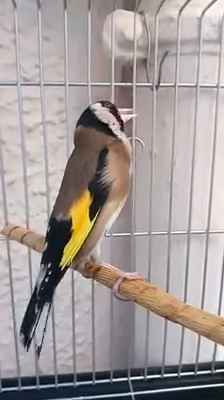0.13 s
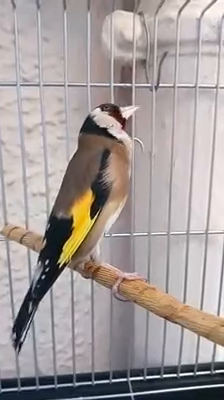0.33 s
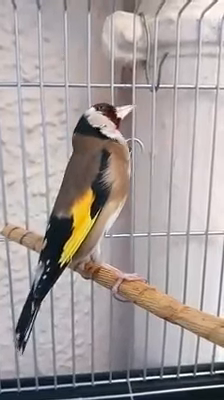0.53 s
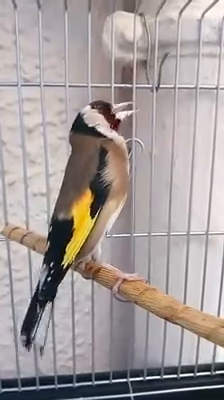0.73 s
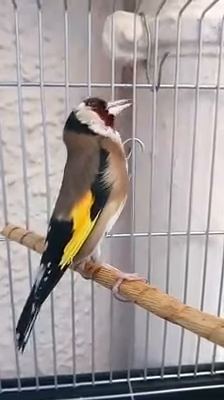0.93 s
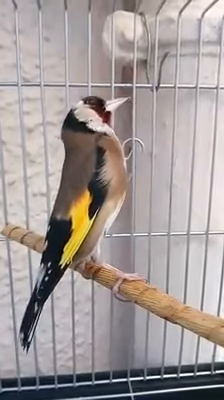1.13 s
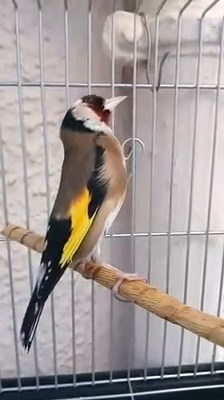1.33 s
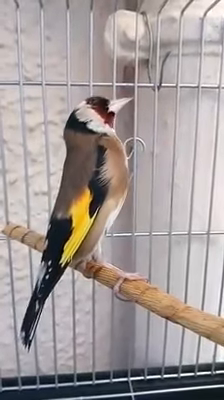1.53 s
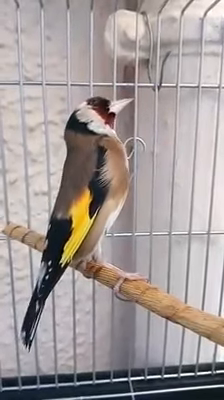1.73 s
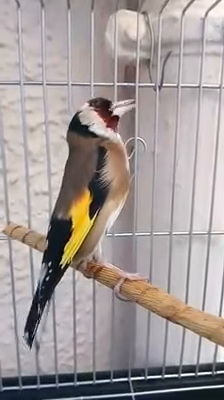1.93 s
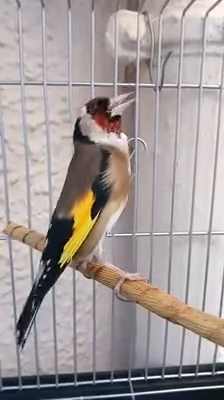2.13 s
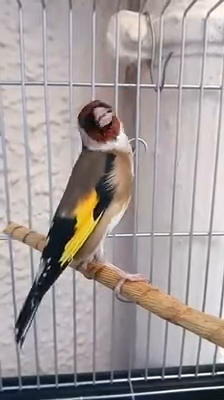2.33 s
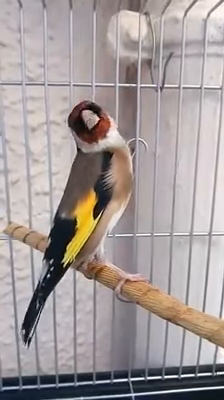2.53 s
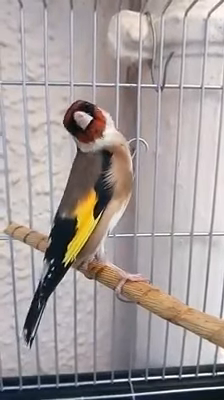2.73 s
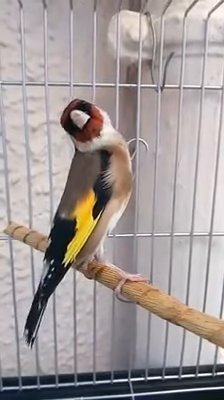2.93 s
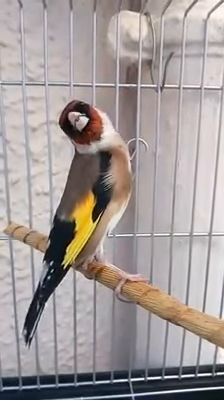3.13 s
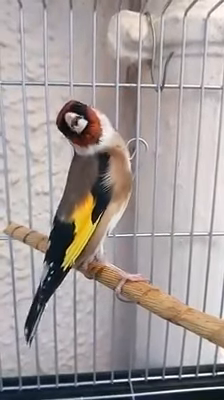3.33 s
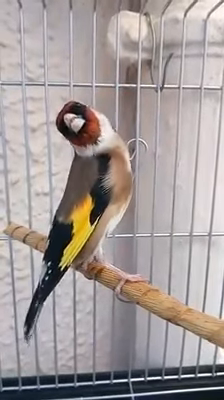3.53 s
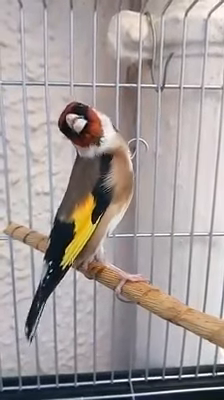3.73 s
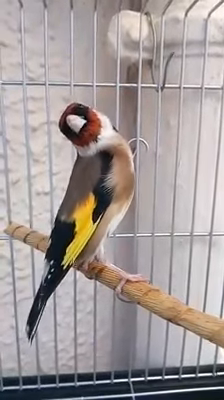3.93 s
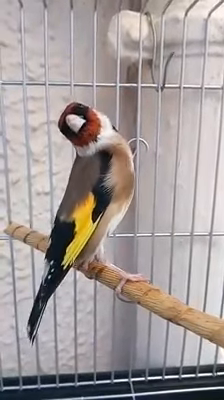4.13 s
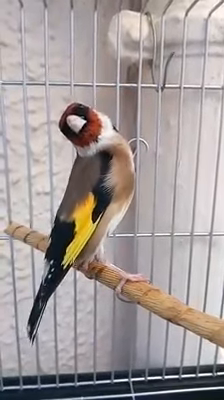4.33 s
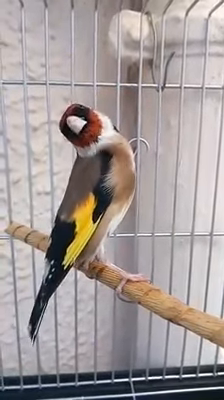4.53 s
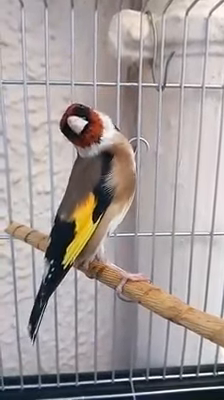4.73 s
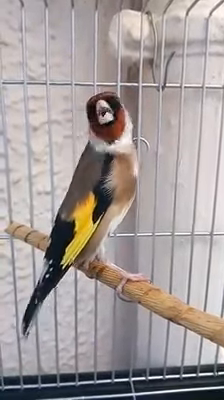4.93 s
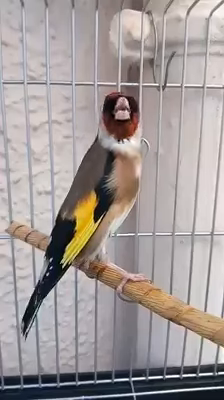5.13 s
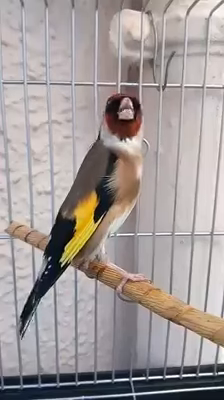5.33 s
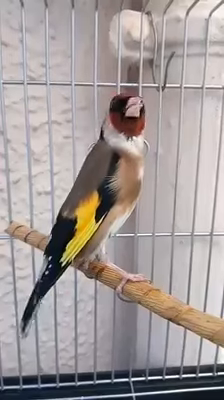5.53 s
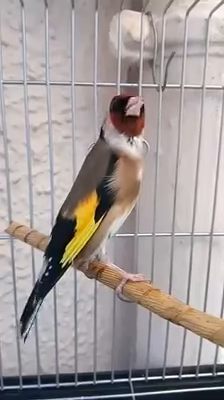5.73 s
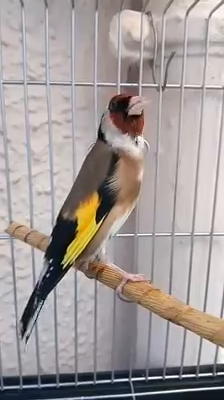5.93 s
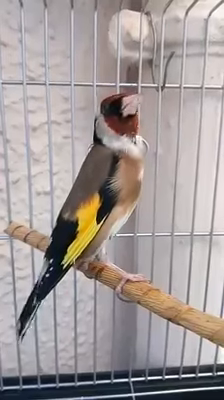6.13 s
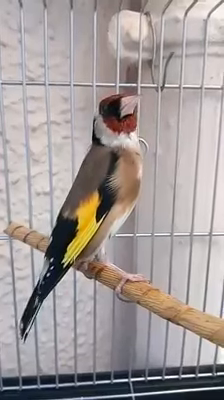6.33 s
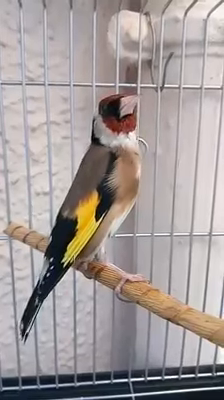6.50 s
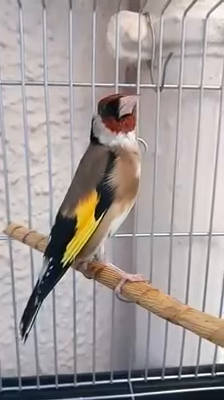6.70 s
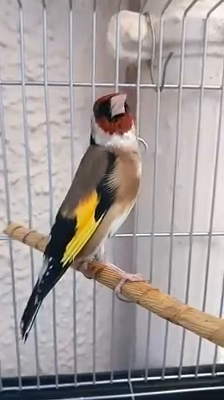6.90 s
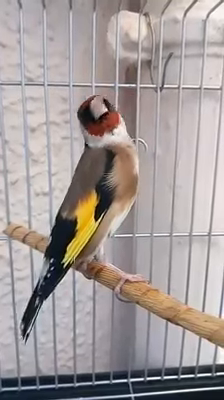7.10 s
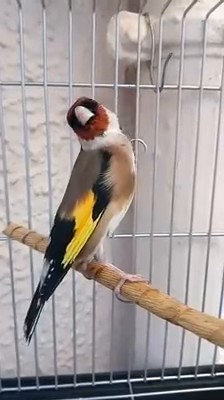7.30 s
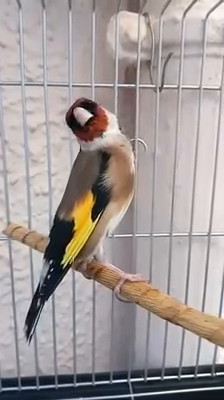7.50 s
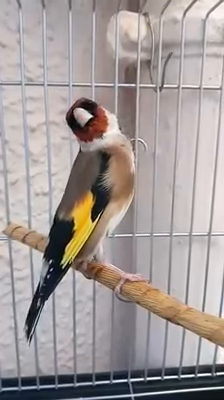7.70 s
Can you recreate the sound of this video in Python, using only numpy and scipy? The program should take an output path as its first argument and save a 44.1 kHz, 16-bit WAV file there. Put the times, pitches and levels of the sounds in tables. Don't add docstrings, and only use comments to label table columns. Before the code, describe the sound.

One small caged finch sings very close to a phone microphone in a hard-walled, echoing space. Short bouts of sharp, rising whistles alternate with pauses; the fifth bout is the longest, a dense rattling twitter. After a gap comes one last lone bright note. Soft city rumble and hiss continue underneath, dipping under each loud note, while faint distant birds chirp, mostly near the end. Treble is slightly gritty and fizzy.

```python
import sys
import numpy as np
from scipy import signal
from scipy.fft import rfft, irfft
from scipy.io import wavfile
from scipy.ndimage import uniform_filter1d, minimum_filter1d

SR = 44100
rng = np.random.default_rng(int(sys.argv[2]) if len(sys.argv) > 2 else 0)


def wrap_up_sound(samples):
    columns = np.atleast_2d(samples).T
    tamed = np.clip(columns, -1, 1)
    steps = np.round(tamed * 32767).astype(np.int16)
    wavfile.write(sys.argv[1], SR, steps)


def boost_factor(decibels):
    exponent = np.asarray(decibels, float) / 20
    return 10 ** exponent


N = 342216

# level_db, attack_end (share), release_start (share), entry_db, exit_db
RISE_VOICES = [
    ((0, .049, 3350, 5350, 1.45, 2.5, 0), (-6, .6, .7, -44, -16)),
    ((0, .056, 3050, 4740, 2.1, 3.8, 0), (-18, .33, .8, -21, -10)),
    ((.004, .026, 4000, 5700, 1.05, 1.2, 0), (-27, .45, .65, -14, -14)),
]
GRUNT_VOICES = [
    ((0, .025, 2600, 2890, 1.05, 1.8, 0), (-24, .48, .55, -22, -18)),
    ((0, .024, 5150, 5850, 1.05, 1.8, 0), (-32, .3, .8, -8, -12)),
]
DIP_VOICES = [
    ((0, .015, 4100, 2850, .98, 2.4, 0), (-14, .33, .4, -22, -12)),
    ((.012, .024, 2900, 3500, 1.1, 3.5, 0), (-10, .42, .55, -14, -24)),
]
PAIR_VOICES = [
    ((0, .029, 3600, 5500, 1.3, 2.2, 350), (-4, .56, .62, -40, -15)),
    ((0, .02, 3200, 4400, 1.1, 1.2, 0), (-19, .3, .7, -10, -14)),
    ((.026, .022, 4500, 5600, 1.3, 1.3, 0), (-2, .34, .42, -20, -26)),
]
# start_s, strength_db, lead_start_hz, lead_end_hz, other_voices_db
RISES = [(.9375, -2, 3650, 5500, 2), (2.1478, 0, 3700, 5530, 3), (2.333, 0, 3250, 5400, -2),
         (3.2672, 0, 3600, 5360, 2), (3.4502, 0, 3150, 5340, -1), (3.623, 0, 3300, 5340, 0),
         (3.8048, 0, 3370, 5360, -1), (4.9682, 0, 3290, 5400, 1), (5.159, 0, 3300, 5250, 0),
         (5.3435, 0, 3450, 5260, 0), (5.5248, -1, 3360, 5250, 0)]
LAZY_RISES = [
    (.1905, 0, 4400, 5550, 0),
]
GRUNTS = [
    (5.066, 0, 2600, 2890, 0),
    (5.249, -2, 2600, 2870, 0),
    (5.431, -4, 2610, 2880, 0),
]
DIPS = [
    (5.619, 0, 4100, 2850, 0),
    (5.8013, 0, 4080, 2850, 0),
    (5.995, 0, 4130, 2870, 0),
    (6.1787, 0, 4050, 2880, 0),
]
PAIRS = [
    (5.7124, 0, 3600, 5480, 0),
    (5.8925, -1, 3600, 5440, 0),
    (6.0862, -1, 3600, 5500, 1),
    (6.2718, -2, 3600, 5520, 0),
]


def evened(x):
    return x / np.sqrt(np.mean(x ** 2) + 1e-20)


def read(points, hz):
    f, value = np.transpose(points)
    return np.interp(np.log(hz + 1), np.log(f + 1), value)


def add(mix, s, sound):
    part = mix[round(s * SR):][:len(sound)]
    part += sound[:len(part)]


def coloured(x, gain):
    return irfft(rfft(x) * gain(np.fft.rfftfreq(len(x), 1 / SR)), len(x))


def above(hz, edge_hz):
    return np.clip((hz - edge_hz) / 240 + .5, 0, 1)


def smeared(x, rows, columns):
    return uniform_filter1d(uniform_filter1d(x, size=rows[0], axis=rows[1]), size=columns[0], axis=columns[1])


def wander(count, size):
    noise = rng.standard_normal(SR // 4)
    return evened(uniform_filter1d(uniform_filter1d(noise, size), size))[:count]


def hum():
    # pitch_hz, level_db (per Hz)
    spectrum = [(18, -40), (30, -17), (70, -1.5), (426, -10.5), (988, -7.5), (2830, -12.5), (3060, -15.5),
                (4530, -22), (5740, -21), (8080, -43), (14000, -39.5), (16000, -43.5)]
    # time_s, hiss_db, rumble_db
    swell = [
        (0.0, -50.5, -58.5),
        (3.02, -55.5, -57),
        (3.35, -56.5, -61),
        (7.76, -52.5, -56.5),
    ]
    gust = 6.95, 0.063, 9.9
    drone = 65, 14, 5.14
    gust_s, gust_width_s, gust_peak_db = gust
    drone_hz, drone_width_hz, drone_peak_db = drone
    frames = N // 512 + 5
    t = np.arange(frames) * 512 / SR
    hz = np.fft.rfftfreq(2048, 1 / SR)[:, None]
    a, b, patches = rng.standard_normal((frames, 1025, 3)).T
    patches = evened(smeared(patches, (16, 0), (8, 1)))
    s, hiss_db, rumble_db = np.transpose(swell)
    low = np.clip((350 - hz) / 200, 0, 1)
    rumble_swell_db = np.interp(t, s, rumble_db - rumble_db.mean())
    hiss_swell_db = np.interp(t, s, hiss_db - hiss_db.mean())
    swell_db = low * rumble_swell_db + (1 - low) * hiss_swell_db
    drone_db = drone_peak_db * np.exp(-((hz - drone_hz) / drone_width_hz) ** 2)
    gust_db = gust_peak_db * np.exp(-((t - gust_s) / gust_width_s) ** 2 - ((hz - 350) / 300) ** 2)
    level_db = read(spectrum, hz) + (2.5 + 0.53 * low) * patches + swell_db + drone_db + gust_db
    wash = signal.istft((a + 1j * b) * boost_factor(level_db), nperseg=2048, noverlap=1536)[1][:N]
    return boost_factor(-54) * evened(wash)


def walls(x):
    # pitch_hz, t60_s
    decay = [(2500, 0.6), (3600, 0.7), (4700, 0.5), (5500, .62), (9000, 0.4)]
    # delay_s, level_db
    slaps = [
        (.008, -27),
        (0.04, -27),
        (.085, -27),
        (.13, -33),
    ]
    hz, t, z = signal.stft(rng.standard_normal(SR), SR, nperseg=256)
    tail = signal.istft(z * boost_factor(-60 * t / read(decay, hz)[:, None]), SR, nperseg=256)[1]
    tail = boost_factor(-24) * tail / np.linalg.norm(tail)
    for s, db in slaps:
        smear = evened(rng.standard_normal(1300) * np.hanning(1300))
        add(tail, s, boost_factor(db) * smear / np.sqrt(1300))

    def wall_colour(hz):
        low_escape_db = -3 * np.log2(hz / 4200 + .1) ** 2
        return boost_factor(low_escape_db + 3 * above(hz, 5250) - 4 * above(hz, 7100)) * (1 - above(hz, 9000))

    return signal.fftconvolve(x, coloured(tail, wall_colour)[:SR - 4000])[:N]


def far_birds():
    # start_s, top_hz, level_db
    chirps = [(.588, 3950, -48), (.62, 4000, -58), (.73, 3670, -57), (.9, 4300, -41), (4.005, 3300, -48),
              (6.76, 3240, -56), (6.79, 3200, -49), (6.89, 5000, -50), (7.135, 3400, -44),
              (7.158, 3900, -48), (7.288, 3400, -52), (7.39, 3400, -51), (7.425, 3250, -43),
              (7.497, 5100, -49), (7.593, 3800, -44), (7.672, 4010, -46)]
    # start_s, length_s, start_hz, end_hz, level_db
    far_calls = [(.13, .04, 2700, 2720, -47), (.47, .11, 810, 776, -47), (.535, .04, 1300, 1255, -47.5),
                 (1.265, .086, 5700, 2836, -55), (1.33, .12, 1300, 1285, -49), (1.36, .2, 2400, 2400, -55),
                 (1.42, .1, 1480, 1520, -52), (3.05, .07, 700, 690, -51.5), (3.2, .06, 700, 700, -52),
                 (5.2, .1, 750, 747, -48), (5.9, .14, 730, 730, -51), (6.813, .035, 3100, 2550, -50.5),
                 (6.93, .03, 3300, 2960, -49.5), (7.36, .04, 5600, 6400, -59)]
    chirp_hz, chirp_s, chirp_hz_per_s = 2880, .018, 1.3e5
    calls = [(*call, 0) for call in far_calls]
    for s, top_hz, db in chirps:
        calls.append((s, chirp_s + (top_hz - chirp_hz) / chirp_hz_per_s, chirp_hz, top_hz, db, -11))
    out = np.zeros(N)
    for s, length, start_hz, end_hz, db, fade_db in calls:
        u = np.linspace(0, 1, round(length * SR))
        flutter = .7 + start_hz / 5000 * wander(count=len(u), size=round(1.6e5 / start_hz))
        turn = 2 * np.pi * np.cumsum(start_hz + (end_hz - start_hz) * u) / SR
        add(out, s, boost_factor(db + fade_db * (u - .4)) * flutter * np.sin(turn) * np.hanning(len(u)))
    return out


def whistle(length, start_hz, end_hz, ease_in, ease_out, sag_hz, db, attack, release, entry_db, exit_db):
    roundness = 1.6
    u = np.linspace(0, 1, round(length * SR))
    glide = 1 - (1 - u ** ease_in) ** ease_out
    hz = start_hz + (end_hz - start_hz) * glide - sag_hz * u ** 1.4
    hz = hz * (1 + 0.004 * wander(count=len(u), size=60))
    turn = 2 * np.pi * (np.cumsum(hz) / SR + rng.random())
    tone = np.sin(turn) + boost_factor(-46) * np.sin(2 * turn)
    waver_db = 1.4 * wander(count=len(u), size=70)
    opening = np.clip(1 - u / attack, 0, 1) ** roundness
    closing = np.clip((u - release) / (1 - min(release, .97)), 0, 1) ** roundness
    breath_db = entry_db * opening + exit_db * closing
    return np.sqrt(2) * tone * boost_factor(db + breath_db + waver_db) * signal.windows.tukey(len(u), .12)


def sung_notes():
    hook = [
        ((0, .047, 3200, 5750, 1.01, 13, 210), (-9, .3, .82, -33, -18)),
        ((-.002, .048, 4100, 6980, .95, 7, 0), (-11, .22, .25, -30, -30)),
        ((.01, .04, 4800, 4250, 1.1, 1.2, 0), (-44, .2, .8, -6, -8)),
    ]
    held_hook = [
        ((0, .046, 3200, 5700, 1.01, 12, 130), (-10, .27, .85, -32, -18)),
        ((-.002, .044, 4100, 6720, .95, 9, 0), (-13, .22, .65, -34, -18)),
    ]
    lazy_rise = [
        ((0, .052, 4400, 5550, 1.9, 2.2, 0), (-9, .58, .62, -7, -22)),
        ((0, .048, 3450, 4750, 2.3, 2.2, 0), (-24, .1, .7, -10, -12)),
        ((.003, .026, 5100, 6000, 1.05, 1.2, 0), (-25, .2, .6, -10, -14)),
    ]
    fall = [
        ((0, .034, 6450, 5500, 1.1, 1.8, 0), (-6, .52, .62, -20, -20)),
        ((.002, .032, 8500, 6950, 1.1, 2.5, 0), (-25, .7, .92, -5, -8)),
    ]
    flick = [
        ((0, .021, 4900, 7600, .92, 1.05, 0), (-7, .45, .55, -11, -36)),
        ((.004, .019, 4600, 6100, .95, 1.8, 0), (-12, .3, .75, -12, -14)),
    ]
    # start_s, strength_db, lead_start_hz, lead_end_hz, other_voices_db
    hooks = [
        (.0484, -1, 3300, 5850, -1),
        (.7828, 0, 3200, 5740, -1),
        (3.1195, 0, 3200, 5660, 0),
        (6.9931, 0, 3200, 5720, -4),
    ]
    held_hooks = [
        (2.0048, 0, 3200, 5700, 0),
        (4.8403, 2, 3200, 5670, 0),
    ]
    short_hooks = [
        (.3045, -3, 3700, 5480, 7),
    ]
    falls = [
        (2.2596, -2, 6550, 5600, 4),
        (2.4387, -2, 6600, 5520, 0),
        (3.381, 1, 6480, 5560, -3),
        (3.5516, 0, 6470, 5480, 0),
        (3.7324, -2, 6490, 5380, 3),
    ]
    flicks = [(5.1112, 0, 4900, 7800, 0), (5.2931, 0, 4900, 7790, 0), (5.4765, -2, 4950, 7700, 0),
              (5.664, -1, 5000, 7650, -1), (5.8469, -1, 5000, 7750, -2), (6.044, 0, 4950, 7750, -3),
              (6.2255, -1, 4950, 7670, -2)]
    phrases = (
        (hook, hooks, 1), (held_hook, held_hooks, 1), (held_hook, short_hooks, .76),
        (lazy_rise, LAZY_RISES, 1), (RISE_VOICES, RISES, 1), (fall, falls, 1), (GRUNT_VOICES, GRUNTS, 1),
        (flick, flicks, 1), (DIP_VOICES, DIPS, 1), (PAIR_VOICES, PAIRS, 1))
    song = np.zeros(N)
    for voices, rows, pace in phrases:
        usual_start, usual_end = voices[0][0][2:4]
        for s, strength_db, start_hz, end_hz, others_db in rows:
            for k, (glide, (db, *breath)) in enumerate(voices):
                delay, length, first_hz, last_hz, *ease = glide
                first_hz = first_hz * start_hz / usual_start
                last_hz = last_hz * end_hz / usual_end
                voice_db = db + strength_db + others_db * (k > 0)
                note = whistle(pace * length, first_hz, last_hz, *ease, voice_db, *breath)
                add(song, s + pace * delay, note)
    return song


def leading_noise():
    noise_lead = np.zeros(N)
    for voices, rows in ((RISE_VOICES, LAZY_RISES + RISES), (PAIR_VOICES, PAIRS),
                         (GRUNT_VOICES, GRUNTS), (DIP_VOICES, DIPS)):
        lead_s = voices[0][0][1]
        for s, strength_db, *_ in rows:
            add(noise_lead, s - .012, boost_factor(strength_db - 33) * np.hanning(round(.9 * lead_s * SR)))
    return noise_lead


def finch():
    # centre_s, half_width_s, level_db
    throbs = [(0.053, 0.003, 5.0), (0.197, 0.004, 2.0), (0.208, 0.005, -6.0), (0.219, 0.003, 5.0),
              (0.228, 0.004, -4.0), (0.312, 0.004, 6.0), (0.328, 0.008, -4.0), (0.815, 0.006, 4.0),
              (0.949, 0.004, 5.3), (0.975, 0.002, -7.1), (2.005, 0.002, 8.2), (2.046, 0.003, -6.1),
              (2.155, 0.004, 6.2), (2.165, 0.004, -8.4), (2.267, 0.003, -7.0), (2.283, 0.004, -4.6),
              (2.337, 0.002, 10.4), (2.348, 0.006, -5.8), (2.447, 0.004, -7.3), (3.274, 0.006, 6.1),
              (3.284, 0.003, -5.6), (3.381, 0.002, -10.8), (3.456, 0.003, 6.8), (3.466, 0.006, -9.1),
              (3.498, 0.008, 3.7), (3.556, 0.002, 8.0), (3.627, 0.003, 10.7), (3.743, 0.004, -7.3),
              (3.764, 0.004, 9.1), (3.809, 0.002, 7.7), (4.882, 0.003, -7.4), (4.972, 0.004, 9.5),
              (5.113, 0.002, -6.3), (5.299, 0.002, 7.7), (5.309, 0.003, 5.0), (5.35, 0.006, 4.8),
              (5.482, 0.003, 5.6), (5.529, 0.003, 7.9), (5.568, 0.006, -4.3), (5.665, 0.002, -13.2),
              (5.85, 0.002, -7.3), (6.189, 0.004, -5.2), (6.229, 0.004, -6.1), (6.245, 0.004, 5.0)]
    # time_s, level_db
    facing = [(0, 7), (1.2, 7), (2, 1), (5.3, 0), (5.6, -4), (6.5, -3), (7.76, 2)]
    # pitch_hz, level_db
    noise_colour = [(1800, -43.5), (2800, -9), (6500, 2), (8650, -5), (8950, -42), (11000, -29), (12800, -44),
                    (14500, -28)]
    song = sung_notes()
    t = np.arange(N) / SR
    for s, width, db in throbs:
        near = slice(round((s - 3 * width) * SR), round((s + 3 * width) * SR))
        song[near] *= boost_factor(db * np.exp(-((t[near] - s) / width) ** 2))
    song = song + 0.06 * boost_factor(np.interp(t, *np.transpose(facing))) * song ** 3
    effort = np.sqrt(abs(uniform_filter1d(song ** 2, size=400)))
    air = evened(coloured(rng.standard_normal(N), lambda hz: boost_factor(read(noise_colour, hz))))
    return song + (boost_factor(-34) * effort + leading_noise()) * air


def scene():
    # time_s, level_db
    to_walls = [(0, 2), (.26, 1), (.3, 7), (.4, 7), (.75, 0), (2, -1), (3.1, 1), (5.55, 0), (5.6, -2),
                (6.4, -2), (6.9, 4), (7.76, 4)]
    bird, others = finch(), far_birds()
    sent = bird * boost_factor(np.interp(np.arange(N) / SR, *np.transpose(to_walls)))
    return (bird + others + walls(sent + 2.1 * others) + hum())[None]


def limiter(x):
    power_db = 10 * np.log10(abs(uniform_filter1d(x ** 2, size=200)) + 1e-12)
    fall = np.arange(N) * 270.0 / SR
    held_db = np.maximum.accumulate(power_db + fall) - fall
    over_db = np.maximum(held_db + 26.5, 0)
    return x / boost_factor(0.37 * uniform_filter1d(over_db, size=150))


def coarse_core(x):
    hole_db, grit_db = -19.5, -22
    hz, s, z = signal.stft(x, SR, window="cosine", nperseg=1024)
    masking = np.sqrt(smeared(abs(z) ** 2, (32, 0), (32, 0)))
    step = boost_factor(-14) * masking + 1e-9
    bands = np.add.reduceat(abs(z) ** 2, np.arange(0, 513, 8), axis=0) / 8
    bands = np.repeat(bands, 8, axis=0)[:513]
    kept = minimum_filter1d(bands / masking ** 2, size=2, axis=1) > boost_factor(2 * hole_db)
    rounded = np.round(z.real / step) + 1j * np.round(z.imag / step)
    z = step * rounded * np.where(kept, 1, boost_factor(-25))
    wide = np.sqrt(abs(smeared(abs(z) ** 2, (60, 0), (40, 0))))
    wide = wide * np.where(wide.max(0) < .1 * wide.max(), boost_factor(8), 1)
    patchy = boost_factor(5.0 * np.repeat(rng.standard_normal((len(s), 33)), 16, axis=1).T[:513])
    grit = rng.standard_normal((len(s), 513, 2)).T
    grit_level = boost_factor(grit_db) * wide * patchy * above(hz, 2750)[:, None] * kept
    z = z + grit_level * (grit[0] + 1j * grit[1])
    return signal.istft(z, SR, window="cosine", nperseg=1024)[1][:N]


def steady_tones(gain, hz, s):
    # start_s, length_s, pitch_hz, level_db (rms)
    fill_tones = [(0.795, 0.03, 6937.5, -27.8), (0.886, 0.023, 6937.5, -39.6),
                  (2.027, 0.033, 6937.5, -28.3), (2.454, 0.015, 6937.5, -22.3),
                  (3.133, 0.036, 6937.5, -22.6), (3.271, 0.028, 8437.5, -54.0),
                  (3.378, 0.022, 8437.5, -42.1), (3.485, 0.016, 9187.5, -56.1),
                  (3.533, 0.03, 9187.5, -42.7), (3.558, 0.024, 12937.5, -55.0),
                  (3.566, 0.016, 6937.5, -19.7), (3.611, 0.028, 6937.5, -43.5),
                  (3.74, 0.028, 12937.5, -57.2), (4.858, 0.034, 6937.5, -29.2),
                  (4.99, 0.019, 9937.5, -51.6), (5.184, 0.017, 9937.5, -52.8),
                  (5.367, 0.017, 9937.5, -53.7), (5.538, 0.044, 9937.5, -57.7),
                  (5.624, 0.021, 9937.5, -62.8), (5.816, 0.023, 9937.5, -61.7),
                  (7.008, 0.019, 6937.5, -18.9), (7.008, 0.02, 12937.5, -54.7),
                  (7.009, 0.017, 14437.5, -51.9),
                  (3.393, .018, 6937.5, -20), (3.411, .017, 6937.5, -33), (3.582, .016, 6937.5, -29),
                  (7.027, .027, 6937.5, -27), (7.054, .09, 6937.5, -50), (7.14, .11, 6937.5, -58),
                  (.83, .11, 6937.5, -44), (.94, .14, 6937.5, -60), (3.17, .09, 6937.5, -42),
                  (3.43, .1, 6937.5, -55), (3.4, .026, 12937.5, -59), (7.026, .73, 14437.5, -80)]
    tones = np.zeros(N)
    for start, length, tone_hz, db in fill_tones:
        gain[abs(hz - tone_hz) < 300] *= np.where((s > start) & (s < start + length), .15, 1)
        u = np.arange(round(length * SR))
        tone = np.sin(2 * np.pi * tone_hz * u / SR) * signal.windows.tukey(len(u), 240 / len(u))
        add(tones, start, np.sqrt(2) * boost_factor(db + 2 - 5 * u / len(u)) * tone)
    return tones


def rebuilt_treble(x):
    # from_hz, to_hz, shift_hz
    patches = [
        (6750, 12750, 6000),
        (12750, 16100, 10500),
    ]
    floor_hz, ceiling_hz = patches[0][0], patches[-1][1]
    t = np.arange(N) / SR
    steps = dict(fs=SR, nperseg=118, noverlap=88)
    high = coloured(x, lambda hz: above(hz, floor_hz) * (1 + .9 * above(hz, 13400)))
    low = coloured(coarse_core(x - high), lambda hz: 1 - above(hz, floor_hz + 150))
    turning = signal.hilbert(low)
    copy = np.zeros(N)
    for a, b, shift in patches:
        shifted = (turning * np.exp(2j * np.pi * shift * t)).real
        copy += coloured(shifted, lambda hz: above(hz, a) - above(hz, b))
    hz, s, z = signal.stft(copy, **steps)
    wanted = signal.stft(high, **steps)[2]
    fizz = rng.standard_normal((len(s), len(hz), 2)).T
    fizz_level = 0.75 * np.sqrt(abs(smeared(abs(z) ** 2, (7, 0), (30, 1))))
    z = z + fizz_level * (fizz[0] + 1j * fizz[1])
    tile = np.arange(len(s)) // 24
    edges = np.flatnonzero(np.diff(tile, prepend=-1))
    wide = (hz > 9000)[:, None]

    def tiled(v):
        energy = np.add.reduceat(abs(v) ** 2, edges, axis=1)
        return np.where(wide, uniform_filter1d(energy * wide, size=4, axis=0), energy)

    have, want = tiled(z), tiled(wanted)
    gain = np.minimum(np.sqrt(abs(want) / (abs(have) + 1e-16)), boost_factor(55))[:, tile]
    tones = steady_tones(gain, hz, s)
    treble = signal.istft(z * gain, **steps)[1][:N]
    return low + coloured(treble, lambda hz: above(hz, floor_hz) - above(hz, ceiling_hz)) + tones


def band_limit(x):
    return signal.sosfilt(signal.butter(12, 17130, fs=SR, output="sos"), x)


def record(dry):
    x = rebuilt_treble(boost_factor(4.0) * limiter(dry[0]))
    envelope = uniform_filter1d(abs(signal.hilbert(x)), size=40)
    x = x / np.maximum(envelope / .76, 1)
    return band_limit(x)


dry = scene()
out = record(dry)
wrap_up_sound(out)
```